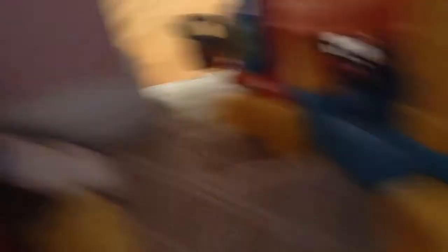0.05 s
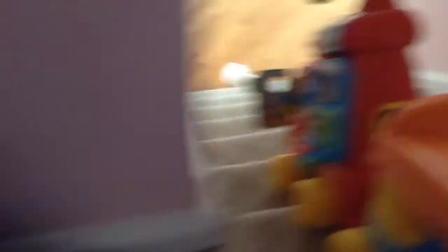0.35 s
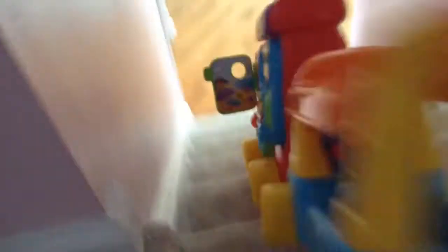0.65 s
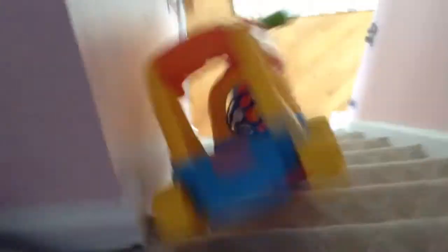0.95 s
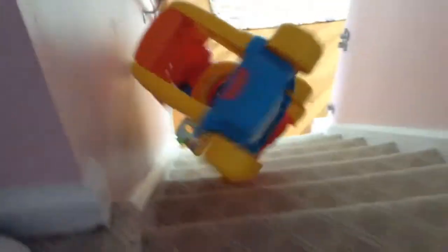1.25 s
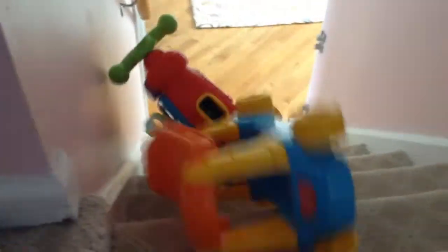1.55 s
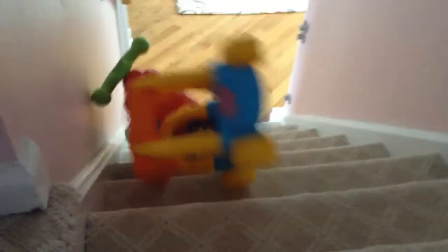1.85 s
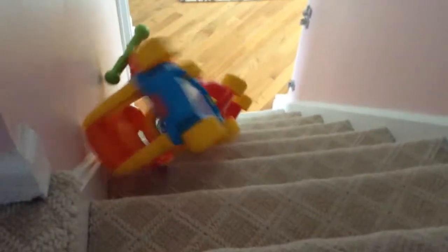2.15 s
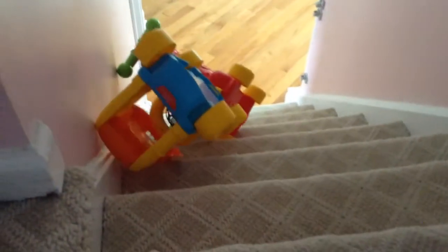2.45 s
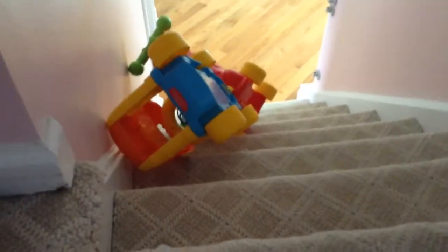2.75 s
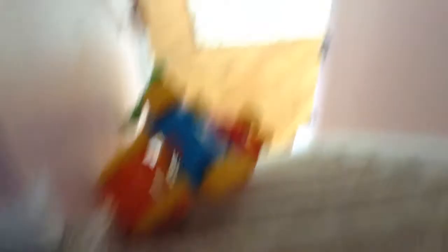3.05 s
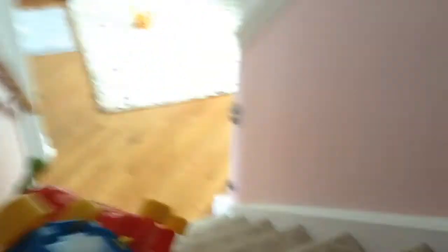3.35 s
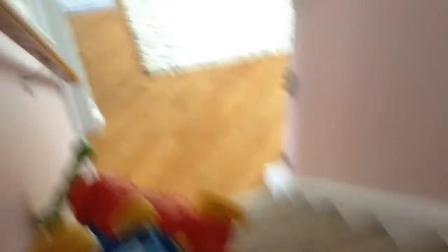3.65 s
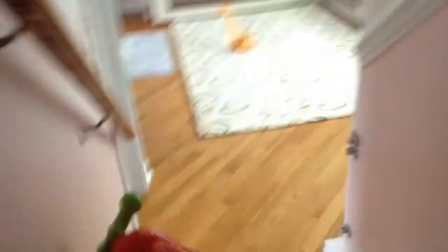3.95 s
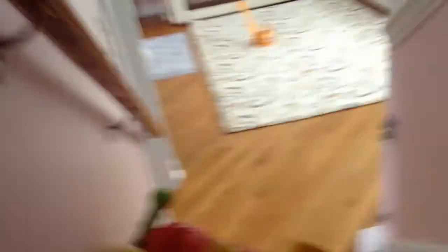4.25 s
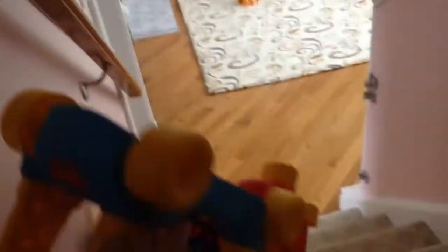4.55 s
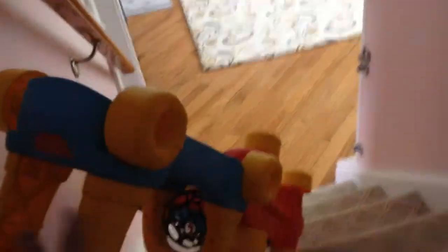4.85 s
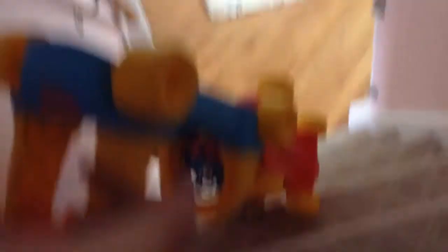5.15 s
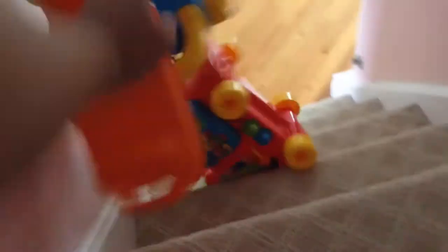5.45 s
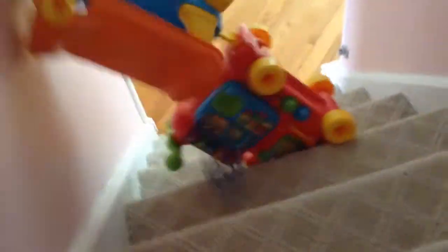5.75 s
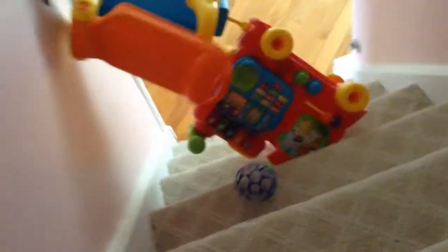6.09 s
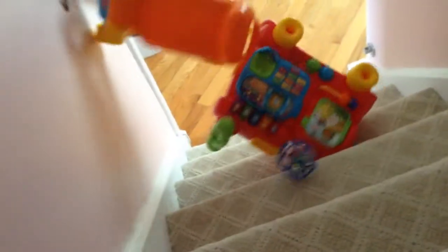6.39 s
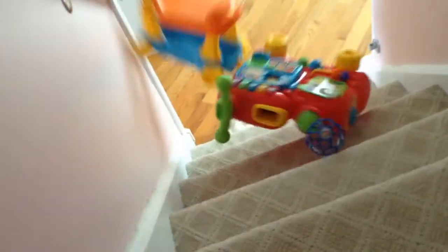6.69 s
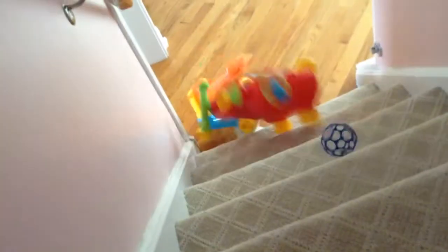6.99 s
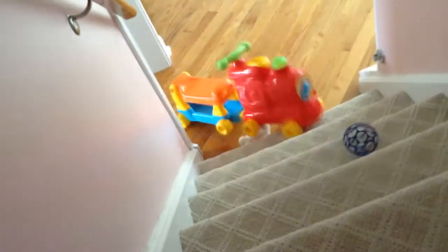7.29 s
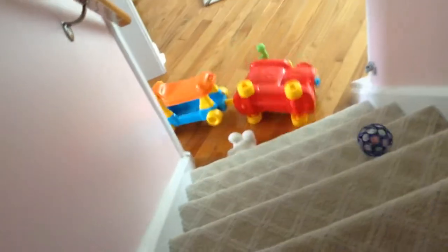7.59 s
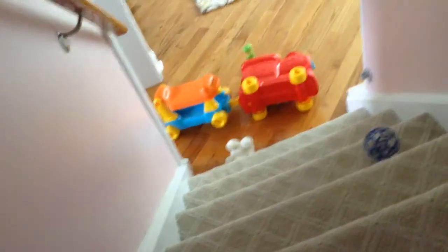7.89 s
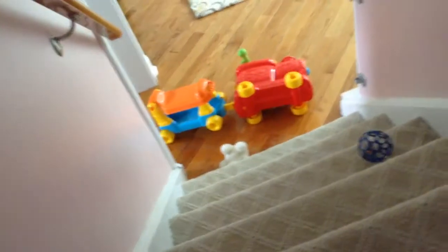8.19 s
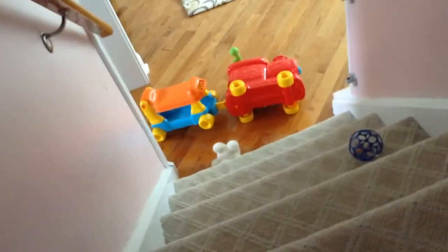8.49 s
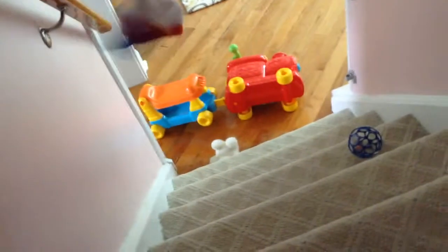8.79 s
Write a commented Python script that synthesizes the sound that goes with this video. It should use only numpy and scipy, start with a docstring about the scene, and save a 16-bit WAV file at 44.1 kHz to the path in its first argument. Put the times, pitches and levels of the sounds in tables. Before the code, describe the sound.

After a soft rustle and a few light clicks, a hollow plastic toy train tumbles down carpeted stairs from about 0.7 to 2.3 seconds, with loud irregular knocks, rumbling wheels and rattling loose parts. It stops. Sleeves rustle quietly, fingers click sharply on the microphone at about 3 seconds, and a hand slides faintly over plastic. Light snaps and a hollow bump follow between 4 and 5 seconds. At about 5.4 seconds the train falls again with heavy knocks, easing into softer bumps and brief scrapes on carpet. A small rattle ball bounces along from 5.8 to 7.3 seconds, its beads giving short bright sprays. From 6.8 seconds the train clatters onto a wooden floor with harder cracks and low thuds, settling just after 8 seconds. Everything is heard from the top of a slightly reverberant home stairwell, over a very faint hum.

```python
"""Toy train down the stairs.

A hollow plastic train tumbles down carpeted stairs, lodges against the wall, is nudged loose and clatters
to the wooden floor. Each blow rings its shell, cavity and panels in the stairwell and shakes its wheels
and loose parts. A small rattle ball bounces down with it, beads spraying against its capsule.
Sleeves rustle, a hand slides on the plastic and fingers click on the camera, over a faint house hum."""
import sys
import numpy as np
from scipy import signal
from scipy.fft import rfft, irfft, next_fast_len
from scipy.io import wavfile
from scipy.ndimage import map_coordinates

SR = 44100
rng = np.random.default_rng(int(sys.argv[2]) if len(sys.argv) > 2 else 0)


def output_pcm(signal):
    """Save a mono or channel-first signal as 16-bit PCM at the path in sys.argv[1].

    Samples are clipped to [-1, 1] before scaling.
    """
    pcm = np.clip(np.atleast_2d(signal).T, -1, 1) * 32767
    wavfile.write(sys.argv[1], SR, np.round(pcm).astype(np.int16))


N = 393813
T = np.arange(SR * 3 // 5) / SR  # time axis of one impact [s]

# train hits steps, wall, floor: (time [s], force [dB], weight [dB], hardness [dB], hollow note [Hz])
BLOWS = [(0.476, -48, 1, 1.5, 268), (0.642, -32, 5.5, -9.5, 275), (0.785, -17.5, -7, 1, 257),
         (0.874, -19.5, -15.5, -0.5, 291), (0.908, -17, -13, 0, 297), (0.927, -21.5, -12.5, -0.5, 263),
         (1.046, -16, -1.5, -2, 247), (1.065, -19, -9.5, -3, 240), (1.141, -36, 15, 11.5, 233),
         (1.363, -29, -5.5, 2, 239), (1.561, -31, -8, 0, 210), (1.582, -30.5, -0.5, -4, 208),
         (1.687, -35, -0.5, -2, 226), (1.782, -24, -13, -21, 282), (1.821, -26.5, 1, 1.5, 241),
         (1.899, -26, 0.5, -0.5, 190), (1.914, -26, -16, 1.5, 199), (2.061, -23, 0.5, 1, 274),
         (2.079, -17.5, -20, -4, 228), (2.102, -21, -4, 1, 208), (2.186, -24, -8, 1.5, 240),
         (2.212, -22.5, -4.5, 2, 233), (5.186, -54.5, 14, -15, 210), (5.271, -39, 4.5, -15, 330),
         (5.459, -18.5, -4.5, -3.5, 303), (5.474, -18, -0.5, -11.5, 303), (5.511, -24, 1, 7, 314),
         (5.529, -42.5, 20, 1.5, 198), (5.723, -15.5, -2, -5.5, 190), (5.81, -27.5, -0.5, -20.5, 266),
         (5.957, -21.5, -9, -0.5, 227), (5.977, -30, 6.5, -3, 214), (6.179, -42, 5, -16, 227),
         (6.346, -41, 8, -30, 213), (6.394, -52.5, 8, -3, 256), (6.442, -42.5, 11, -5, 214),
         (6.581, -35.5, 4, -10.5, 228), (6.828, -18, 0.5, 9.5, 166), (6.893, -17.5, -8.5, 6, 210),
         (6.913, -22.5, 1, 7, 290), (6.943, -19, -4.5, 5, 227), (6.987, -20, 0.5, 3, 156),
         (7.024, -21.5, -3.5, 7, 220), (7.147, -30, 5, 14.5, 338), (7.164, -23, -5, 8.5, 335),
         (7.196, -26.5, -12.5, 3, 302), (7.341, -21, 5, 3, 371), (7.388, -27.5, -4, 4.5, 225),
         (7.444, -23, 4.5, 7.5, 214), (7.474, -31, 0.5, -5, 225), (7.567, -27.5, 10, 9.5, 237),
         (7.583, -25.5, 6, -1.5, 229), (7.618, -21, 4.5, 11, 226), (7.647, -23, -3, 2, 241),
         (7.702, -22.5, 0.5, 3, 191), (7.847, -25.5, -0.5, 7, 280), (7.897, -28.5, 4, -7, 271),
         (7.992, -39, -5, -6, 332)]
# spectrum of the plastic shell: (frequency [Hz], gain [dB])
PLASTIC = [(40, -38.5), (70, -22.5), (110, -10.5), (165, -8), (230, 4), (320, -7), (460, -9), (700, -6),
           (1250, -9), (2500, -16.5), (5500, -23), (9000, -15.5), (10800, -25), (12800, -24.5),
           (15500, -32)]
# decay of the shell's modes: (frequency [Hz], t60 [s])
SHELL_T60 = [(200, 0.088), (800, 0.11), (3000, 0.087), (12000, 0.055)]


def amp(db):
    """Decibels to gain."""
    return 10 ** (np.asarray(db) / 20)


def unit(x):
    """Scale to rms 1."""
    return x / np.sqrt(np.mean(x ** 2) + 1e-20)


def along(points, hz):
    """Interpolate (frequency [Hz], value) points on a log axis."""
    f, v = np.transpose(points)
    return np.interp(np.log(hz + 1), np.log(f + 1), v)


def fade(t60_s, t=T):
    """Exponential decay."""
    return np.exp(-np.log(1000) * t / t60_s)


def add(track, s, sound):
    """Mix a sound in at time s."""
    part = track[max(0, round(s * SR)):][:len(sound)]
    part += sound[:len(part)]


def band(x, lo_hz, hi_hz, order=2):
    """Causal band-pass."""
    sos = signal.butter(order, [lo_hz, min(hi_hz, SR / 2 - 100)], "band", fs=SR, output="sos")
    return signal.sosfilt(sos, x)


def coloured(x, spectrum):
    """Filter by (frequency [Hz], gain [dB]) points; rms 1."""
    m = next_fast_len(len(x) + 4096)
    gain = amp(along(spectrum, np.fft.rfftfreq(m, 1 / SR)))
    return unit(irfft(rfft(x, m) * gain, m)[:len(x)])


def resonate(x, peaks):
    """Parallel resonances (centre [Hz], width [Hz], level [dB]); rms 1."""
    return unit(sum(amp(db) * unit(band(x, max(hz - width / 2, 100), hz + width / 2, order=1))
                    for hz, width, db in peaks))


def wobble(rate_hz):
    """Smooth random curve."""
    knots = rng.standard_normal(int(N * rate_hz / SR) + 4)
    return map_coordinates(knots, [np.arange(N) * rate_hz / SR])


def swells(rows, skew):
    """Envelope of movements (start [s], length [s], level [dB]); skew below 1 peaks early."""
    out = np.zeros(N)
    for s, length_s, db in rows:
        add(out, s, amp(db) * np.sin(np.pi * np.linspace(0, 1, round(length_s * SR)) ** skew))
    return out


def contacts(rate_hz, spread_db):
    """Random small impacts of unequal size."""
    hits = (rng.random(N) < rate_hz / SR) * rng.choice([-1, 1], N)
    return hits * amp(spread_db * np.minimum(rng.standard_normal(N), 2))


def mode_cloud(t60_curve):
    """Dense modes as noise, each frequency fading at its own rate; energy 1."""
    hz, t, bins = signal.stft(rng.standard_normal(len(T)), SR, nperseg=256)
    bins = bins * fade(along(t60_curve, hz)[:, None], t)
    x = signal.istft(bins, SR, nperseg=256)[1][:len(T)]
    return x / np.linalg.norm(x)


def ring(modes, scatter_db, detune):
    """Damped modes; each blow bends the plastic anew, shifting their levels and pitches."""
    chance = rng.standard_normal((len(modes), 2))
    return sum(amp(db + scatter_db * a) * np.sin(2 * np.pi * hz * (1 + detune * b) * T) * fade(t60_s)
               for (hz, db, t60_s), (a, b) in zip(modes, chance))


def stairwell(x, wet_db):
    """Direct sound plus wall reflections, which differ from place to place."""
    # reverberation: (frequency [Hz], t60 [s])
    decay = [(100, 0.68), (260, 0.15), (700, 0.44), (1800, 0.28), (5000, 0.31), (13000, 0.29)]
    tail = mode_cloud(decay) * (1 - fade(0.025))
    return x + amp(wet_db) * signal.fftconvolve(x, tail)[:len(x)]


def shell(crack_db, crack_t60_s):
    """One contact on thin plastic: a crack, then the shell's crowded modes."""
    crack = rng.standard_normal(len(T)) * fade(crack_t60_s)
    return coloured(mode_cloud(SHELL_T60) + amp(crack_db) * crack / np.linalg.norm(crack), PLASTIC)


def voiced(x, force_db, hard_db, boom_db, snap_db):
    """Balance four registers over the first 25 ms; a harder contact is shorter, so brighter."""
    # boom, knock, clack and snap registers: (low edge [Hz], high edge [Hz])
    registers = [(140, 400), (400, 1800), (1800, 6000), (6000, 16000)]
    levels_db = force_db + np.array([boom_db, 0, -3.5 + 0.42 * hard_db, snap_db + hard_db])
    parts = [band(x, lo, hi, order=3) for lo, hi in registers]
    return sum(amp(db) * part / np.std(part[:SR // 40]) for part, db in zip(parts, levels_db))


def house():
    """Still air and a faint, slightly unsteady hum."""
    # household hum: (frequency [Hz], relative level [dB])
    tones = [(156.1, -73), (231.5, -75), (317.6, -82)]
    # still air: (frequency [Hz], gain [dB])
    air_spectrum = [(18, -80.5), (30, -54.5), (124, -23), (138, -11.5), (161, -10.5), (194, -22),
                    (287, -20), (319, -2.5), (345, -30), (415, -22), (4420, -32.5), (13700, -31),
                    (16000, -48.5)]
    t = np.arange(N) / SR
    drift_rad = 0.012 * np.cumsum(rng.standard_normal((len(tones), N)), axis=1)
    hum = sum(amp(db) * np.sqrt(2) * np.sin(2 * np.pi * hz * t + phase)
              for (hz, db), phase in zip(tones, drift_rad))
    air = amp(-70.5) * coloured(rng.standard_normal(N), air_spectrum)
    return amp(-3) * hum + air


def rubbing():
    """Sliding fibres hiss; firmer strokes add a coarse, uneven scuff."""
    # sleeve and carpet strokes: (start [s], length [s], level [dB], coarseness [dB])
    strokes = [(0.0, 0.16, -62.5, 5.5), (0.125, 0.24, -53.5, -9), (0.341, 0.19, -54.5, 0.5),
               (0.476, 0.29, -52.5, -2.5), (0.66, 0.12, -44, -15), (1.09, 0.21, -39, -1),
               (2.62, 0.1, -69, 2), (2.87, 0.33, -68, 1.5), (3.049, 0.12, -58.5, -11),
               (3.154, 0.2, -63.5, -1), (3.347, 0.25, -66.5, -3), (3.45, 0.84, -58.5, -7.5),
               (3.53, 0.14, -78, 14), (3.655, 0.41, -70.5, 8.5), (4.13, 0.7, -62, 3.5),
               (4.92, 0.22, -68.5, -7), (4.98, 0.43, -61, 2), (5.19, 0.19, -64, 5), (5.277, 0.043, -41, -1),
               (8.44, 0.37, -78, -11)]
    # sliding cloth: (frequency [Hz], gain [dB])
    cloth = [(88, -39.5), (150, -11.5), (182, -18), (235, -1), (376, -7), (960, -15), (1240, -8.5),
             (3920, -9), (8900, -8), (14800, -31), (16000, -46)]
    # resonances under a sleeve: (centre [Hz], width [Hz], level [dB])
    scuff_peaks = [(250, 180, 9.5), (685, 1800, 10.5), (1202, 56, 0), (1790, 140, -6), (2397, 150, -4.5),
                   (3140, 140, -8.5)]
    fibres = coloured(contacts(rate_hz=14000, spread_db=2.5), cloth)
    hiss = unit(band(fibres, 6700, 13000, order=1)) * amp(1.6 * wobble(rate_hz=21))
    uneven = amp(2 * wobble(rate_hz=35))
    catches = resonate(contacts(rate_hz=1200, spread_db=0.5), scuff_peaks)
    scuff = unit(band(catches, 160, 4600)) * uneven
    fine = swells([(s, length, db) for s, length, db, _ in strokes], skew=0.47)
    coarse = swells([(s, length, db + coarse_db) for s, length, db, coarse_db in strokes], skew=0.53)
    return fine * hiss + coarse * scuff


def hand_scrape():
    """Skin sticks and slips on the smooth shell, waking faint, squeaky resonances."""
    # hand slides: (start [s], length [s], level [dB])
    slides = [(3.525, 0.11, -56), (3.66, 0.39, -71)]
    # resonances under the hand: (centre [Hz], width [Hz], level [dB])
    skin_peaks = [(1230, 110, -1), (1700, 150, -4), (2410, 170, -3)]
    slips = contacts(rate_hz=400, spread_db=2.5)
    squeak = resonate(resonate(slips, skin_peaks), skin_peaks)  # two passes sharpen the peaks
    return swells(slides, skew=0.5) * squeak


def fingers():
    """Dry clicks, each with a brief swell of fine crackle that stops just after it."""
    # finger clicks: (time [s], peak [dB], ring [Hz], t60 [s])
    clicks = [(3.0448, -28, 3100, 0.0033), (3.0956, -9, 2880, 0.0012), (3.1215, -19.5, 3120, 0.0047),
              (3.1379, -9.5, 10000, 0.0028)]
    # resonances of the camera's case: (centre [Hz], width [Hz], level [dB])
    case_peaks = [(1390, 1600, -31.5), (2680, 2900, 8), (7300, 4000, 5.5)]
    crackle_db, swell_t60_s, stop_t60_s = -21.5, 0.065, 0.012
    out, crackle, t = np.zeros(N), np.zeros(N), np.arange(N) / SR
    for s, db, hz, t60_s in clicks:
        case = ring([(hz, 0, t60_s), (7200, -2, 0.0012), (1700, -8, 0.002)], scatter_db=1, detune=0)
        click = band(case + 0.5 * signal.unit_impulse(len(T)), 1200, 20000)
        add(out, s, amp(db) * click / np.abs(click).max())
        crackle += amp(db + crackle_db) * fade(np.where(t < s, swell_t60_s, stop_t60_s), np.abs(t - s))
    ticks = resonate(contacts(rate_hz=3100, spread_db=12), case_peaks)
    return out + crackle * unit(band(ticks, 990, 16000))


def rattle_ball():
    """At each bounce the beads hit the capsule in a quick, bright spray."""
    # bounces: (time [s], peak [dB])
    bounces = [(5.8441, -17), (5.942, -15.5), (6.122, -15.5), (6.2858, -18), (6.3961, -25.5), (6.6184, -17),
               (7.129, -16), (7.29, -24.5)]
    # beads on the capsule: (frequency [Hz], gain [dB])
    bead_spectrum = [(2000, -21), (5500, -15), (8000, -1), (10500, -2.5), (12600, 4.5), (15500, -4.5)]
    out = np.zeros(N)
    for s, db in bounces:
        hits = rng.standard_normal(len(T)) * (rng.random(len(T)) < 0.1)
        spray = hits * fade(0.13) * (1 - fade(0.025))
        sound = stairwell(coloured(spray, bead_spectrum), wet_db=-3)
        add(out, s, amp(db) * sound / np.abs(sound).max())
    return out


def carpet_drag():
    """Carpet tufts catch and release the sliding body, exciting its hollow resonances."""
    # drags over a step: (start [s], length [s], relative level [dB])
    drags = [(6.17, 0.04, -36), (6.39, 0.12, -27), (6.53, 0.14, -24), (6.66, 0.089, -31.5)]
    # body resonances: (centre [Hz], width [Hz], level [dB])
    body_peaks = [(600, 43, 10.5), (856, 90, 16), (990, 140, -1.5), (1310, 150, -29)]
    body = resonate(contacts(rate_hz=440, spread_db=-8.5), body_peaks)
    return amp(-9.5) * swells(drags, skew=1.3) * unit(band(stairwell(body, wet_db=-1), 380, 1700))


def tread_thuds():
    """Wooden treads give a low push under the carpet."""
    # a tread takes the weight: (time [s], peak [dB])
    landings = [(0.786, -64), (1.048, -60), (5.513, -47), (5.722, -56), (6.827, -54), (7.342, -42),
                (7.445, -55), (7.62, -35)]
    out = np.zeros(N)
    for s, db in landings:
        push = band(rng.standard_normal(len(T)) * fade(0.12), 48, 110)
        add(out, s, amp(db) * push / np.abs(push).max())
    return out


def wagon_bumps():
    """A soft blow rings a few low modes of the wagon's tub; a firmer grip stops them sooner."""
    # bumps: (time [s], relative level [dB], grip t60 [s], contact cut-off [Hz])
    bumps = [(4.379, -10, 0.9, 2540), (4.8429, -23.5, 0.073, 770)]
    # tub modes: (frequency [Hz], level [dB], t60 [s])
    tub_modes = [(266, 4.5, 0.084), (409, 13, 0.16), (576, 12, 0.055), (724, -7, 0.21), (777, -1.5, 0.35),
                 (935, -6.5, 0.27), (1170, -14, .25), (1860, -27.5, .19)]
    out = np.zeros(N)
    for s, db, grip_t60_s, contact_hz in bumps:
        gripped = ring(tub_modes, scatter_db=-5.5, detune=0.0027) * fade(grip_t60_s)
        tub = band(gripped, 180, contact_hz, order=4)
        add(out, s, amp(db - 2) * stairwell(tub / np.abs(tub).max(), wet_db=-4.5))
    return out


def part_snaps():
    """Latches and axles knock in their sockets, short and fairly dry, each with its own hollow note."""
    # snaps: (time [s], force [dB], hardness [dB], note [Hz])
    snaps = [(0.033, -38, -10, 670), (0.495, -46, -11, 929), (0.573, -41, 2.5, 793), (0.741, -30, 10, 662),
             (0.763, -27, -13, 697), (2.888, -51, -12, 740), (3.297, -54, -21, 930),
             (3.328, -55.5, -7, 770), (4.027, -50.5, 9, 1300), (4.054, -42.5, 1.5, 2600),
             (4.094, -48.5, -1, 1250), (4.128, -41.5, 17, 796), (4.278, -47.5, -14, 620),
             (4.326, -35, -26, 976), (4.379, -26, 1, 646), (4.405, -27, -9, 894), (4.481, -33.5, -5, 1090),
             (4.573, -50, 12.5, 905), (4.853, -44.5, 0.5, 560), (5.121, -40, -32, 690),
             (5.362, -35.5, -16, 1590), (5.595, -27, 8.5, 1005), (5.654, -37, 20.5, 990),
             (5.862, -30, 8.5, 830), (6.602, -36.5, -9, 860), (6.768, -40, -4, 1480)]
    knock_db, note_db = -10, 4
    out = np.zeros(N)
    for s, force_db, hard_db, hz in snaps:
        contact = stairwell(shell(crack_db=-1, crack_t60_s=0.03), wet_db=-5)
        knock = voiced(contact, force_db, hard_db, boom_db=-0.5, snap_db=-9)
        add(out, s, amp(knock_db) * band(knock, 260, 18000))  # too small for deep bass
        note = np.sin(2 * np.pi * hz * T) * fade(0.038 * (1000 / hz) ** 0.5) * (1 - fade(0.001))
        add(out, s, amp(force_db + note_db) * band(note, 300, 12000))
    return out


def clatter(rate_hz, spread_db, count):
    """Random contacts shared among several pieces, each with its own ring."""
    pieces = []
    for _ in range(count):
        hits = contacts(rate_hz / count, spread_db)
        pieces.append(signal.fftconvolve(hits, mode_cloud(SHELL_T60) * fade(0.031))[:N])
    return coloured(sum(stairwell(piece, wet_db=0.5) for piece in pieces), PLASTIC)


def shaken(kicks, t60_s):
    """Agitation of loose parts: each kick (time [s], level [dB]) adds energy, which drains away."""
    rise_s = 0.031  # parts fly up before they fall back
    energy, t = np.zeros(N), np.arange(SR) / SR
    for s, db in kicks:
        add(energy, s, (amp(db) * fade(t60_s, t) * (1 - fade(rise_s, t))) ** 2)
    return np.sqrt(energy)


def loose_parts():
    """Wheels rumble on their axles and small pieces chatter on the shell, after blows and while rolling."""
    # rolling and rocking: (start [s], length [s], rumble [dB], rattle [dB])
    rolls = [(0.662, 0.17, -54, -37.5), (0.801, 0.31, -35.5, -28.5), (1.719, 0.39, -32.5, -37.5),
             (4.511, 0.3, -46, -63), (5.185, 0.51, -40.5, -48.5), (5.63, 0.17, -42, -34.5),
             (6.382, 0.5, -44.5, -44.5), (6.9, 0.36, -32, -33.5), (7.868, 0.35, -46.5, -87)]
    axle_hz, axle_half_width_hz, axle_db = 9260, 225, -6.5
    chatter = clatter(rate_hz=270, spread_db=2, count=6)
    wheel_knocks = stairwell(contacts(rate_hz=540, spread_db=4.5), wet_db=3.5)
    wheels = unit(band(wheel_knocks, 170, 350, order=3))
    rattle = unit(band(chatter, 350, 4500))
    tinkle = unit(band(chatter, 9000, 14500))
    axle_ring = unit(band(chatter, axle_hz - axle_half_width_hz, axle_hz + axle_half_width_hz))
    jingle = unit(tinkle + amp(axle_db) * axle_ring)
    rolling = swells([(s, length, db) for s, length, db, _ in rolls], skew=0.9)
    rocking = swells([(s, length, db) for s, length, _, db in rolls], skew=0.55)
    heavy = shaken([(s, db + weight_db - 16) for s, db, weight_db, _, _ in BLOWS], t60_s=0.73)
    light = shaken([(s, db - 15) for s, db, _, _, _ in BLOWS], t60_s=0.57)
    tiny = shaken([(s, db + hard_db - 26.5) for s, db, _, hard_db, _ in BLOWS], t60_s=0.59)
    return (wheels * np.hypot(heavy, amp(-4) * rolling) + rattle * np.hypot(light, rocking)
            + jingle * tiny + tinkle * amp(-9.5) * rocking)


def edge_cracks():
    """Hard edges of wheel and frame ring high and briefly."""
    # edge hits: (time [s], peak [dB], ring [Hz])
    cracks = [(0.786, -16, 2990), (1.049, -13.5, 5200), (1.363, -31, 8530), (1.561, -28, 2500),
              (5.724, -12, 3590), (6.894, -15, 6520), (7.164, -11.5, 8500), (7.446, -13.5, 8550),
              (7.62, -12, 8800), (7.848, -15.5, 4960)]
    out = np.zeros(N)
    for s, db, hz in cracks:
        burst = rng.standard_normal(len(T)) * fade(0.016)
        edge = stairwell(band(burst, hz * 0.7, hz * 1.11), wet_db=-14)
        add(out, s, amp(db) * edge / np.abs(edge).max())
    return out


def tumble():
    """Each blow rings shell, cavity and panels; further down, the colour shifts. The panels ring weaker once
    the train has been nudged loose, from 2.5 s to 5.4 s."""
    # colour change at the foot of the stairs: (frequency [Hz], gain [dB])
    far_colour = [(100, -3), (4500, -1.5), (7000, -1.5), (9500, 3.5), (12000, -2), (15500, -9)]
    # the engine's panel modes: (frequency [Hz], level [dB], t60 [s])
    panel_modes = [(230, 3.5, 0.57), (764, -9.5, 0.51), (950, -5.5, 0.81), (1327, -2.5, .85),
                   (2460, -7, .5)]
    # panel ring against the blow: (time [s], level [dB])
    panel_levels = [(2.5, -25), (5.4, -33.5)]
    descent_s, lead_s, cavity_t60_s = (6, 7), 0.003, 0.11
    spot_hz = np.geomspace(400, 15000, 26)
    out = np.zeros(N)
    for s, force_db, weight_db, hard_db, hz in BLOWS:
        depth = np.interp(s, descent_s, [0, 1])
        body = stairwell(shell(crack_db=-5, crack_t60_s=0.0022), wet_db=1.9 * depth)
        spot_db = 2.1 * rng.standard_normal(len(spot_hz))  # the struck spot favours some resonances
        body = coloured(body, np.column_stack([spot_hz, spot_db + depth * along(far_colour, spot_hz)]))
        rise_s = 0.013 * amp(-0.69 * hard_db)  # carpet slows the rise; hard contacts rise faster
        body *= 1 - fade(rise_s)
        add(out, s, amp(-6) * voiced(body, force_db, hard_db, boom_db=weight_db - 2.5, snap_db=-7))
        cavity = np.sin(2 * np.pi * hz * T) * fade(cavity_t60_s) * (1 - fade(0.0085))
        add(out, s, amp(force_db + weight_db + 0.5) * stairwell(band(cavity, 130, 2000), wet_db=-6.5))
        # a wheel touches just before the body, most audibly in a hard fall
        touch = band(shell(crack_db=1, crack_t60_s=0.006), 300, 14000, order=1) * fade(0.02)
        add(out, s - lead_s, amp(1.49 * force_db - 2.5) * touch / np.std(touch[:SR // 250]))
        panel_db = np.interp(s, *np.transpose(panel_levels))
        add(out, s, amp(force_db + panel_db) * ring(panel_modes, scatter_db=4.5, detune=0.0034))
    return out


def scene():
    """Mono mix, heard from the top of the stairs."""
    impacts = tumble() + edge_cracks() + part_snaps() + wagon_bumps() + tread_thuds()
    train = impacts + loose_parts() + carpet_drag()
    return (train + rattle_ball() + fingers() + rubbing() + hand_scrape() + house())[None]


def record(dry):
    """The camera rounds off the highest peaks and limits the bandwidth."""
    ceiling, top_hz, taper_hz = 0.5, 15700, 500
    rounded = dry / (1 + np.abs(dry / ceiling) ** 6) ** (1 / 6)
    m = next_fast_len(N + 4096)
    passband = np.clip((top_hz - np.fft.rfftfreq(m, 1 / SR)) / taper_hz + 0.5, 0, 1)
    return irfft(rfft(rounded, m) * passband, m)[:, :N]


dry = scene()
out = record(dry)
output_pcm(out)
```